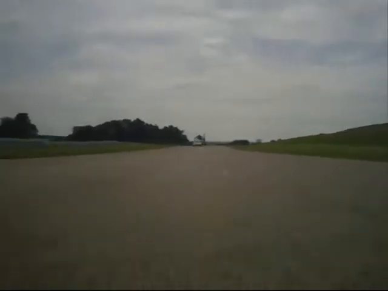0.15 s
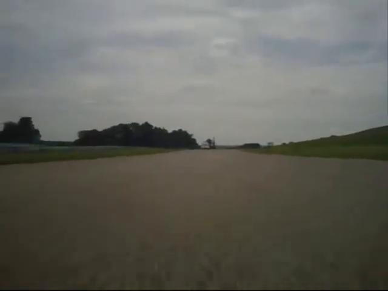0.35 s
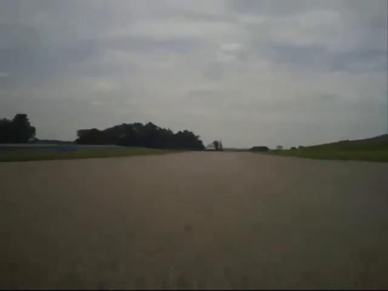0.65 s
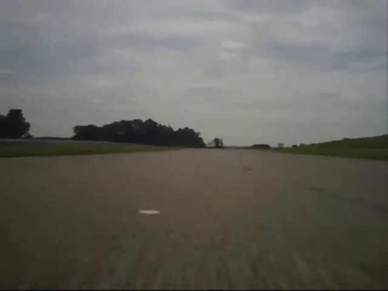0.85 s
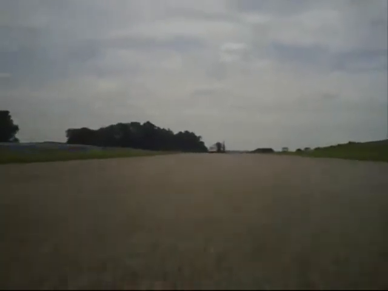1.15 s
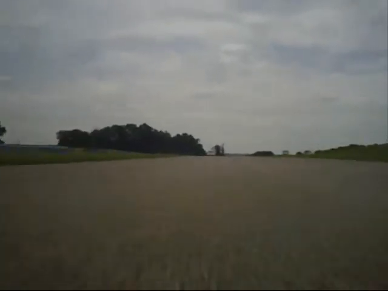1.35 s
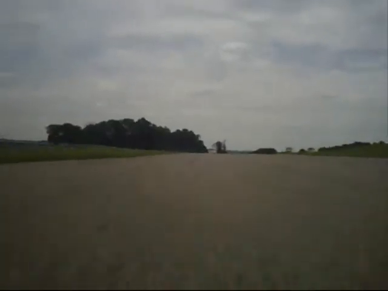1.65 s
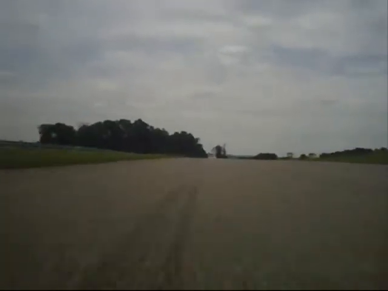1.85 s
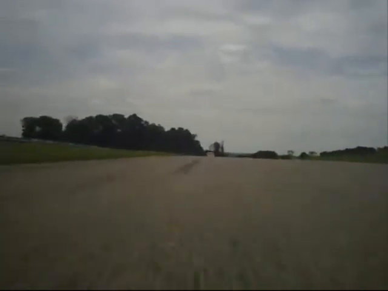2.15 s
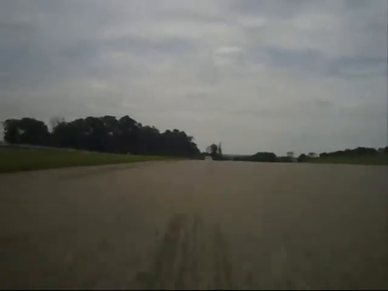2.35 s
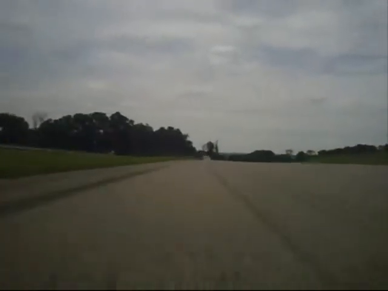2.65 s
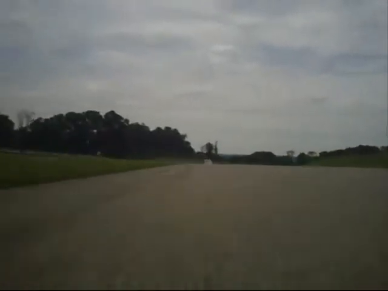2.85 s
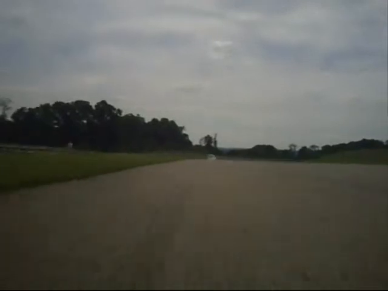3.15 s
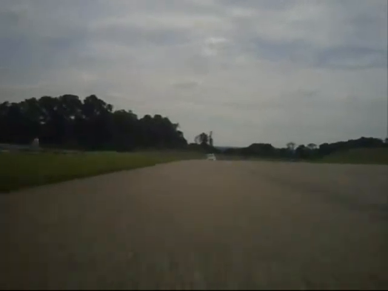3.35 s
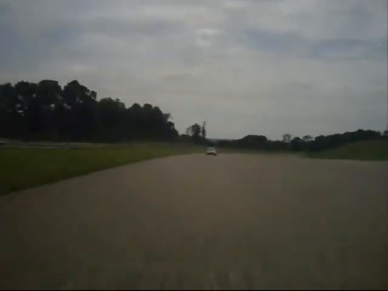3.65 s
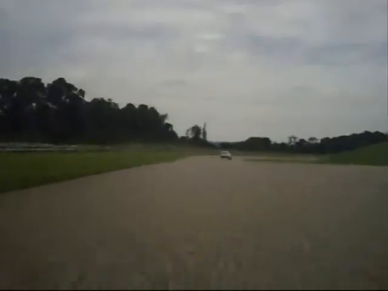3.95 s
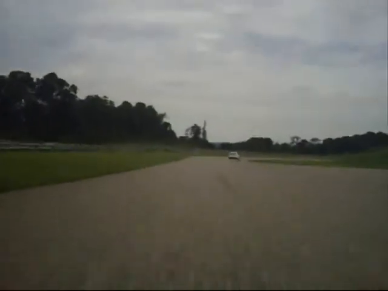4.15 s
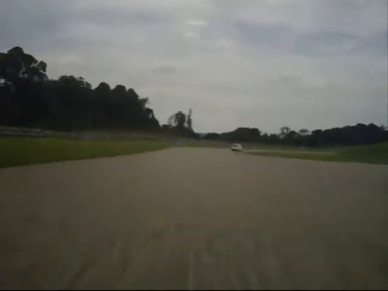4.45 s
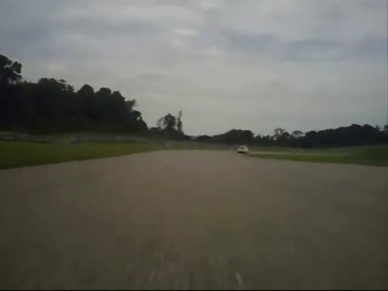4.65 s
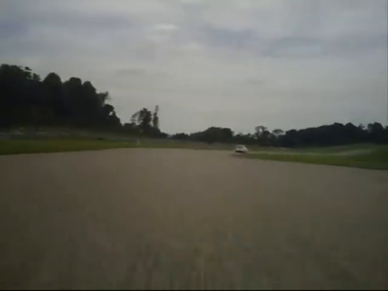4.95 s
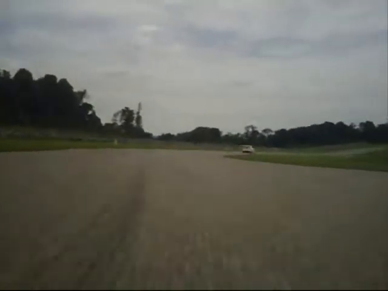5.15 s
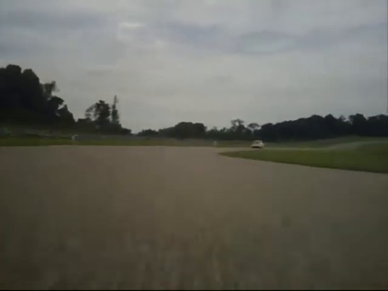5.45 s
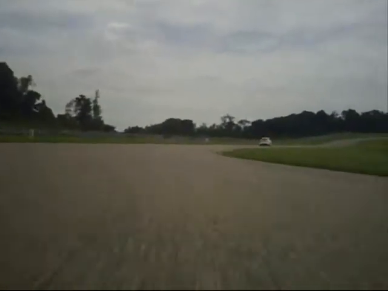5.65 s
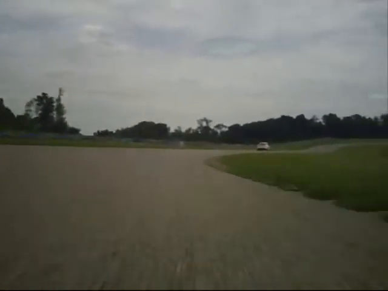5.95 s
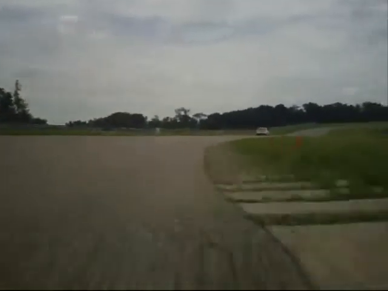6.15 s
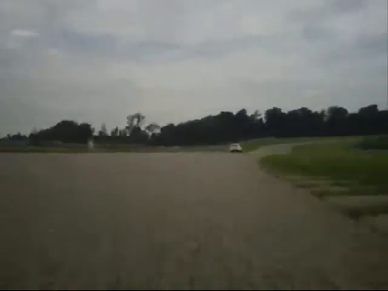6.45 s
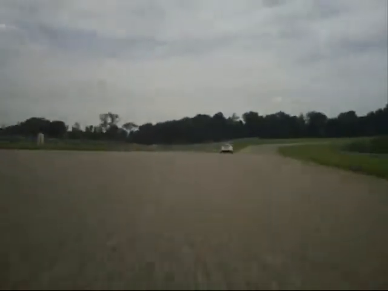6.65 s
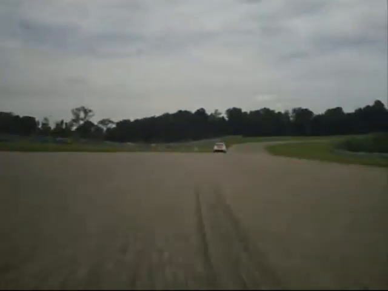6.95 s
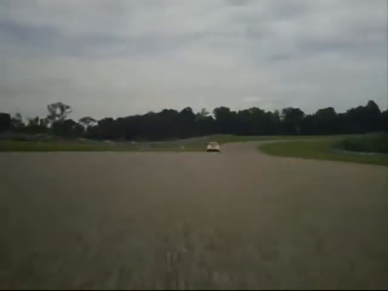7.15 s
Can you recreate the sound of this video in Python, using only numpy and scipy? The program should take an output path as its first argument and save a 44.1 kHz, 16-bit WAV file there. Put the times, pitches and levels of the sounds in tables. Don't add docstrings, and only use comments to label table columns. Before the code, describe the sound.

Gritty, narrow-band onboard sound with dull treble. A hard-pulling engine with raspy intake roar climbs slightly in pitch while the road shakes the body into low thuds and rumble; one tiny pebble ticks early. At about four seconds the driver lifts off and the roar vanishes, leaving a thinner falling drone and wind. Later a rapid kerb judder overloads the microphone for over half a second, then road rumble and hiss return.

```python
import sys
import numpy as np
from scipy import signal
from scipy.fft import rfft, irfft, next_fast_len
from scipy.io import wavfile
from scipy.ndimage import uniform_filter1d

SR = 44100
rng = np.random.default_rng(int(sys.argv[2]) if len(sys.argv) > 2 else 0)


def to_linear_factor(level_db):
    exponent = np.asarray(level_db, float) / 20
    return 10 ** exponent


def digitize_waveform(pressure):
    field = np.atleast_2d(pressure).T
    bounded = np.clip(field, -1, 1)
    quanta = np.round(bounded * 32767).astype(np.int16)
    wavfile.write(sys.argv[1], SR, quanta)


N = 321912


def curve(rows):
    s, *columns = np.transpose(rows)
    return [np.interp(np.arange(N) / SR, s, c) for c in columns]


def unit(x):
    return x / np.sqrt(np.mean(x ** 2))


def coloured(points):
    hz, db = np.transpose(points)
    size = next_fast_len(N)
    axis = np.log(np.arange(size // 2 + 1) * SR / size + 1)
    gain = to_linear_factor(np.interp(axis, np.log(hz), db, left=-120, right=-120))
    noise = rng.standard_normal(size)
    return unit(irfft(gain * rfft(noise), size)[:N])


def band(x, hz, width):
    return signal.lfilter(*signal.iirpeak(hz, hz / width, SR), x)


def walk(rate):
    hold = int(SR / rate)
    steps = np.repeat(rng.standard_normal(N // hold + 1), hold)
    return unit(uniform_filter1d(uniform_filter1d(steps, hold), hold)[:N])


def steadied(x, span_s, share):
    power = uniform_filter1d(x ** 2, int(span_s * SR))
    return unit(x / (power + .02) ** (np.clip(share, 0, 1) / 2))


def bumps_db():
    # t/s, peak level/dB, half
    # length/s
    road_bumps = [(0.026, -20, 0.027), (0.129, -16, 0.024), (0.288, -17, 0.054), (0.515, -18, 0.084),
                  (0.722, -25, 0.078), (.84, -19.5, 0.032), (0.957, -24.5, 0.069), (1.098, -20, 0.038),
                  (1.25, -18.5, 0.068), (1.444, -23.5, 0.047), (1.634, -18, 0.076), (1.839, -18, 0.029),
                  (1.947, -20, 0.042), (2.115, -18, 0.058), (2.418, -19.5, 0.12), (2.648, -18, 0.093),
                  (2.89, -21, 0.076), (3.088, -18, 0.067), (3.345, -19.5, 0.018), (3.488, -17.5, 0.029),
                  (3.62, -18, 0.025), (3.827, -20.5, 0.11), (3.983, -18, 0.02), (4.335, -21, 0.17),
                  (4.762, -18.5, .17), (5.014, -22, 0.023), (5.125, -21.5, .03), (5.351, -20.5, 0.13),
                  (5.55, -19, 0.084), (5.816, -19, 0.15),
                  (6.599, -23.5, .05),
        (6.86, -20.5, .1),
        (7.032, -21, 0.042),
        (7.191, -20, 0.04),
    ]
    smooth_road_db = -33
    t = np.arange(N) / SR
    power = to_linear_factor(2 * smooth_road_db)
    for s, db, half_s in road_bumps:
        power = power + to_linear_factor(2 * db) * np.exp(-((t - s) / half_s) ** 2)
    return 10 * np.log10(power)


def road():
    # f/Hz, level/dB per Hz
    boom_colour = [(18, -36.5), (30, -6), (43, -7), (102, -1), (117, -3), (134, -25.5), (160, -17.5),
                   (210, -35), (350, -120)]
    # f/Hz, level/dB per Hz
    body_colour = [(4.7, -40), (8.0, 2), (96, -3), (120, -7.5), (250, -20.5), (520, -36), (680, -52),
                   (1140, -120)]
    body_db = -27
    boom = to_linear_factor(bumps_db() - 1.0) * steadied(coloured(boom_colour), span_s=.05, share=.85)
    rumble = to_linear_factor(body_db + .7 * walk(6)) * coloured(body_colour)
    return boom + rumble


def shake():
    # start t/s, length/s, peak level/dB over full scale, lean/share of the swing
    bites = [(5.949, .006, 5.5, 0), (5.96, .029, 3.8, -.22), (5.993, .101, 7.8, .08), (6.11, .002, 5, -.2),
             (6.126, .037, 7, -.05), (6.183, .007, 7.3, -.05), (6.206, .008, 7.5, .05),
             (6.235, .004, 7, -.1), (6.247, .009, 3, -.35), (6.269, .032, 4.2, -.2),
             (6.306, .028, 6.5, -.05), (6.351, .005, 5, -.1), (6.368, .003, 6, .35), (6.384, .008, -6, 0),
             (6.398, .014, -1.5, 0), (6.428, .013, 3, -.25), (6.445, .001, 4.5, .1), (6.452, .05, -.5, 0),
             (6.508, .01, -4, 0), (6.524, .052, -10, 0)]
    skip_db_per_ms, lean_s = 1.25, .006
    start, length, peak_db, lean = np.transpose(bites)[:, :, None]
    t = np.arange(N) / SR
    away_ms = 1000 * np.maximum(np.maximum(start - t, t - start - length), 0)
    db = peak_db - skip_db_per_ms * away_ms
    strongest = db.argmax(axis=0)
    return db.max(axis=0), uniform_filter1d(lean[strongest, 0], int(lean_s * SR))


def kerb():
    # t/s, ridges passed/count
    ridges = [
        (5.935, 2),
        (5.959, 4),
        (6.0935, 16),
        (6.1626, 22),
        (6.1796, 24),
        (6.2423, 28),
        (6.345, 37),
        (6.444, 46),
        (6.62, 63.8),
    ]
    ridge_scatter = .04
    (ridge,) = curve(ridges)
    shake_db, lean = shake()
    swing = np.sin(2 * np.pi * (ridge - .06 + ridge_scatter * walk(70)))
    sway = .1 * unit(band(rng.standard_normal(N), 45., 40.))
    panel_rattle = to_linear_factor(-30) * unit(band(rng.standard_normal(N), 350., 300.))
    trim_rattle = to_linear_factor(-39.5) * unit(band(rng.standard_normal(N), 2600.0, 1000.0))
    rattle = to_linear_factor(shake_db) * (panel_rattle + trim_rattle)
    hard_bite_db = .4 * np.maximum(shake_db, 0)
    return to_linear_factor(shake_db + hard_bite_db + 2) * (shake_db > -30) * (swing + lean + sway + rattle)


def engine():
    # t/s, f/Hz
    revs = [(0.0, 46.74), (0.7, 47.96), (1.4, 49.08), (2.1, 50.3), (2.8, 51.4), (3.4, 52.42), (3.95, 53.08),
            (4.5, 52.22), (5.1, 51.44), (5.8, 50.68), (6.6, 48.82), (7.3, 48.0)]
    # t/s, throttle/0-1
    throttle = [
        (0, 0.84),
        (3.88, 0.97),
        (3.96, 0.12),
        (7.3, 0.),
    ]
    # multiple of the cycle, pulling level/dB, coasting level/dB
    order = [(3, -56, -40), (4, -45, -61), (5, -38, -62), (6, -51, -52), (7, -52, -59), (8, -60, -59),
             (12, -58, -58), (16, -59, -73), (18, -61, -69), (19, -61, -68), (20, -62, -69),
             (21, -51.5, -81), (22, -61, -66), (23, -52, -72), (24, -63, -65), (25, -60, -71),
             (26, -63, -62), (27, -46.5, -75), (28, -56, -62), (29, -56, -73), (30, -49, -57),
             (31, -54, -78), (32, -53, -66), (33, -53, -71), (34, -57, -59), (35, -61, -74), (36, -58, -70),
             (37, -63, -79), (38, -58, -63), (39, -63, -66)]
    # multiple of the cycle, pulling level/dB, coasting level/dB
    faint = [(k, -68, -72) for k in (10, 11, 15, 17, 40, 41, 42)]
    # multiple of the cycle, pulling level/dB, coasting level/dB
    whine = [(12.12, -64, -55), (15.3, -61, -66), (24.3, -66, -58), (36.4, -66, -63), (44.8, -66, -66),
             (48.8, -58, -64), (50.4, -62, -63), (52, -63, -63), (54.0, -70, -61), (56.0, -62, -62)]
    # f/Hz, width/Hz, gain/dB
    pipe = [(242.6, 14, 9.5), (1135, 77, 1.5), (1236, 63, 2.5), (1300, 75, 6.5), (1420, 70, 4),
            (1600, 270, 5), (2560, 90, 6)]
    # f/Hz, width/Hz, level/dB
    roar_modes = [
        (1093, 760, -52.5),
        (1523, 350, -44),
        (2618, 260, -45),
    ]

    (hz,), (load,) = curve(revs), curve(throttle)
    crank = 2 * np.pi * (np.cumsum(hz) / SR + 0.002 * walk(25))
    waver = [walk(rate) for rate in (3, 5, 7, 9, 12)]
    tones = 0
    for k, (multiple, pull_db, coast_db) in enumerate([*order, *faint, *whine]):
        db = coast_db + load * (pull_db - coast_db) + 3 + 1.5 * waver[k % 5]
        for mode_hz, width, gain_db in pipe:
            if abs(multiple * 50 / mode_hz - 1) < .09:
                detuning = 2 * (multiple * hz - mode_hz) / width
                db = db + load * (gain_db / (1 + detuning ** 2) - gain_db / 2)
        phase = 2 * np.pi * rng.random()
        tones = tones + np.sqrt(2) * to_linear_factor(db) * np.sin(multiple * crank + phase)
    roar = 0
    for mode_hz, width, db in roar_modes:
        once = band(rng.standard_normal(N), mode_hz, width)
        roar = roar + to_linear_factor(db) * unit(band(once, mode_hz, width))
    return tones + load * roar


def wind():
    # t/s, level/dB
    air = [
        [(0, -44), (1.3, -43), (2.4, -42), (4.4, -40.5), (5.9, -39.5)],
        [(6.62, -40), (7.3, -42)],
    ]
    # f/Hz, level/dB per Hz
    hiss_colour = [(240, 7), (400, -2.5), (471, -3.5), (623, -4), (679, -5), (980, -5), (1090, -7),
                   (1360, -5), (1540, 1.5), (1710, -6.5), (1920, -1), (2180, -9.5), (2800, 0.5),
                   (3430, -5.5), (4000, -19.5), (5200, -71), (8800, -120)]
    (wind_db,) = curve([*air[0], *air[1]])
    buffet_db = 1.2 * walk(250)
    return to_linear_factor(wind_db + 4.5 + buffet_db) * coloured(hiss_colour)


def pebble():
    tick = np.zeros(N)
    tick[int(.398 * SR)] = 1
    return to_linear_factor(-6) * band(tick, 3200, 1800)


def scene():
    shake_db, _ = shake()
    grip = 1 / (1 + 3 * to_linear_factor(shake_db))
    return (to_linear_factor(4.5) * grip * road() + kerb() + engine() + wind() + pebble())[None]


def roll_off(x):
    return signal.sosfilt(signal.butter(12, 13040, fs=SR, output="sos"), x)


def record(dry):
    rail, knee = np.where(dry > 0, 1.0, 1.38), np.where(dry > 0, 2, 11)
    x = dry / (1 + np.abs(dry / rail) ** knee) ** (1 / knee)
    x = signal.sosfilt(signal.butter(1, 85, "high", fs=SR, output="sos"), x)
    x = signal.sosfilt(signal.ellip(6, .3, 50, 3900, fs=SR, output="sos"), x)
    hold_hz = 8000
    held = (np.floor(np.arange(N) * hold_hz / SR) * SR / hold_hz).astype(int)
    x = x[:, held]
    law, steps = 255, 56
    span = np.log1p(law)
    rounded = np.round(steps * np.log1p(law * np.abs(x)) / span) / steps
    x = np.sign(x) * np.expm1(rounded * span) / law
    x = np.where(np.abs(x) > 1, -.15 * (x - np.sign(x)), x)
    x = signal.sosfilt(signal.ellip(7, .1, 30, 12500, fs=SR, output="sos"), x)
    x = np.clip(x, -1, 1)
    return roll_off(x)


dry = scene()
out = record(dry)
digitize_waveform(out)
```